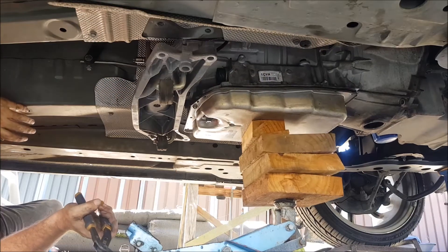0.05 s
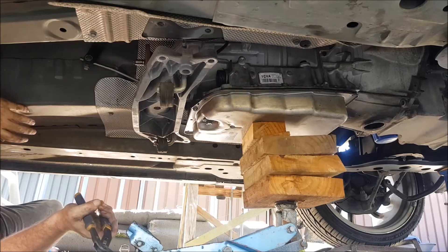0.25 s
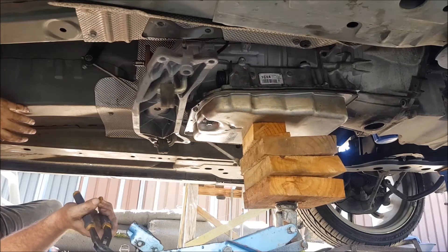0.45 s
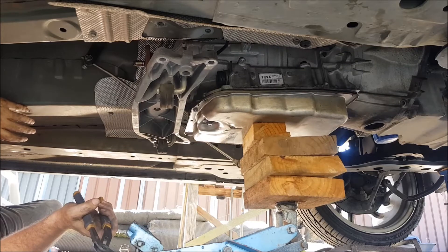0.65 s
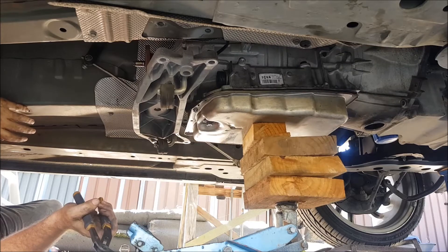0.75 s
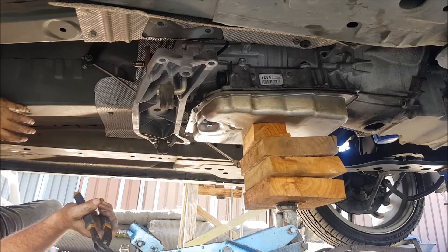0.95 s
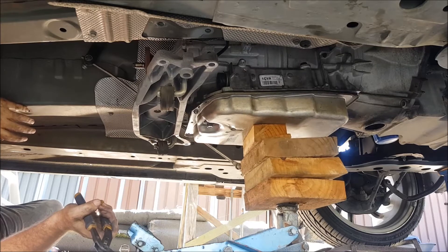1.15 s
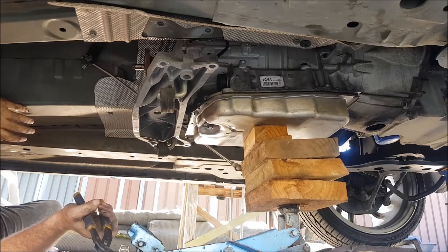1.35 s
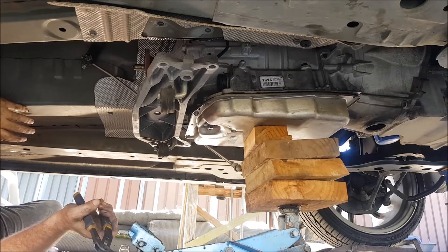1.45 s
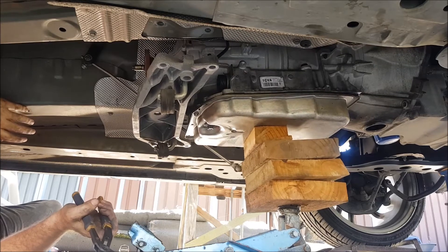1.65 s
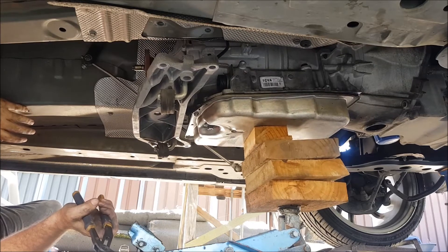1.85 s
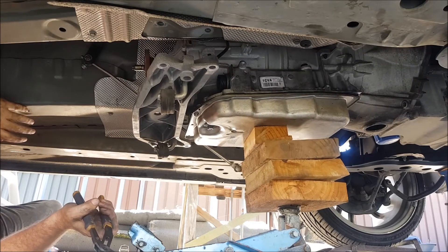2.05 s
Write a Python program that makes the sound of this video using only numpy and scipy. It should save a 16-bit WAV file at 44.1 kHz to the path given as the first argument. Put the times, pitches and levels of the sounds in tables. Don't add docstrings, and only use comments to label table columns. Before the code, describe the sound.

A heavy gearbox slips on wooden blocks over a trolley jack. After a faint slide and a tick at 0.13 s, five hollow knocks fall from 0.2 to 0.6 s, with harsh stick-slip scrapes between; the third, at 0.43 s, is loudest and rings steel. Faint ticks follow, clearer around 1.4-1.65 s, with a late faint scrape. Short garage echo, low rumble, slight hiss; close stereo microphone, brighter right.

```python
import sys
import numpy as np
from scipy import signal
from scipy.fft import rfft, irfft
from scipy.io import wavfile
from scipy.ndimage import uniform_filter1d

SR = 44100
rng = np.random.default_rng(int(sys.argv[2]) if len(sys.argv) > 2 else 0)


def invert_db(level):
    return 10 ** (np.asarray(level, dtype=float) / 20)


def generate_wav(signal):
    frames = np.transpose(np.atleast_2d(signal))
    scaled = np.clip(frames, -1, 1) * 32767
    pcm = np.round(scaled).astype(np.int16)
    wavfile.write(sys.argv[1], SR, pcm)


N = 92610

# (frequency [Hz], level [dB], decay t60 [s])
CASING_MODES = [(177.1, 2.5, 0.27), (217.1, -1.5, .2), (248, -0.5, 0.41), (278, -3, 0.39), (344.3, 1, 0.21),
                (388.6, 2, 0.13), (433.3, -7.5, 0.4), (498.1, -4.5, 0.14), (570, -5, .08),
                (674, -10.5, 0.27), (777, -11.5, .05), (941.2, -10.5, 0.052), (1084.5, -6, 0.04),
                (1222, -20.5, .1)]


def evened(x):
    return x / np.sqrt(np.mean(x ** 2) + 1e-20)


def read(points, hz):
    f, value = np.transpose(points)
    return np.interp(np.log(hz + 1), np.log(f + 1), value)


def add(mix, s, sound):
    part = mix[..., round(s * SR):][..., :sound.shape[-1]]
    part += sound[..., :part.shape[-1]]


def colour(x, points):
    hz = np.fft.rfftfreq(x.shape[-1], 1 / SR)
    return irfft(rfft(x) * invert_db(read(points, hz)), x.shape[-1])


def ring(modes, tilt_db=0., spread_db=1.5, length=0.39):
    hz, db, t60 = np.transpose(modes)[..., None]
    t = np.arange(round(length * SR)) / SR
    level = db + tilt_db * np.log2(hz / hz[0]) + spread_db * rng.standard_normal(hz.shape)
    size = invert_db(level) * np.sign(rng.standard_normal(hz.shape))
    decay = np.log(1000) / np.maximum(t60, .01)
    partials = size * np.exp(t * (2j * np.pi * hz - decay)).imag
    return partials.sum(0) * (1 - (t / length) ** 4)


def burst(hold_s, t60, tail_db, tail_t60):
    t = np.arange(SR // 4) / SR
    rise = np.minimum(t / .0015, 1)
    fall = invert_db(-60 * np.maximum(t - hold_s, 0) / t60)
    return rise * (fall + invert_db(tail_db - 60 * t / tail_t60))


def rumble(patchy_db=2.):
    # (frequency [Hz], level [dB])
    spectrum = [(26, -42.5), (45, -4.5), (161, -8), (191, -13.5), (506, -17.5), (641, -22.5), (912, -23),
                (2500, -41), (3250, -77.5), (5500, -120)]
    # (frequency [Hz], correlation [-])
    likeness = [(60, 0.93), (240, 0.93), (950, -0.21), (3770, -0.9), (15000, -2.8)]
    # (frequency [Hz], left over right [dB])
    balance = [(60, -0.5), (240, 0.5), (950, -8), (3770, -9.5), (15000, -3.5)]
    # (time [s], low rumble gain [dB])
    activity = [(0, 12.5), (.2, 10), (.3, 20), (.5, 12.5), (0.748, 3.5), (1.3, 3.5), (1.6, 7), (1.802, 8.5),
                (2.1, 6.5)]
    level_db, busy_hz = -56.5, 900
    frames, hz = N // 256 + 5, np.fft.rfftfreq(1024, 1 / SR)
    a, b, c, d, patches = rng.standard_normal((frames, 513, 5)).T
    patches = uniform_filter1d(patches, size=8, axis=0)
    patches = evened(uniform_filter1d(patches, size=10, axis=1))
    same = np.clip(read(likeness, hz), -1, 1)[:, None]
    left = a + 1j * b
    right = same * left + np.sqrt(1 - same ** 2) * (c + 1j * d)
    pan = read(balance, hz)[:, None] / 2
    gain = invert_db(read(spectrum, hz)[:, None] + patchy_db * patches + np.array([pan, -pan]))
    z = np.array([left, right]) * gain
    swell = np.interp(np.arange(frames) * 256 / SR, *np.transpose(activity))
    swell = swell / (1 + (hz[:, None] / busy_hz) ** 2)
    calm = signal.istft(z, nperseg=1024, noverlap=768)[1]
    busy = signal.istft(z * invert_db(swell), nperseg=1024, noverlap=768)[1]
    return invert_db(level_db) * busy[:, :N] / np.std(calm)


def hiss():
    # (frequency [Hz], level [dB])
    spectrum = [(1470, -38), (2500, 0), (2860, 4), (4780, -3.5), (14600, -10.5), (16200, -17)]
    port_db = -73 + np.array([[-4], [0]])
    return invert_db(port_db) * evened(colour(rng.standard_normal((2, N)), spectrum))


def room(x):
    # (frequency [Hz], decay t60 [s])
    room_t60 = [(150, 0.48), (1000, .25), (4000, 0.15), (12000, 0.15)]
    wet_db = [-13.5, -7]
    # (frequency [Hz], level [dB])
    far_side = [(200, -14.5), (600, 1.5), (2000, 0.5), (5000, -7.5), (9000, -19), (15000, -3)]
    # (frequency [Hz], level [dB])
    near_side = [(200, -14), (600, -3), (2000, 5.5), (15000, 2)]
    taps = np.zeros((2, SR // 2))
    jitter = rng.integers(0, 20, (2, (SR // 2 - 161) // 20))
    at = np.arange(160, SR // 2 - 20, 20) + jitter
    np.put_along_axis(taps, at, rng.choice([-1., 1.], at.shape), 1)
    hz, t, z = signal.stft(taps, SR, nperseg=256)
    t60 = np.maximum(read(room_t60, hz), .03)[:, None]
    tail = signal.istft(z * invert_db(-60 * t / t60), SR, nperseg=256)[1]
    wet = signal.fftconvolve(x[None], tail / np.linalg.norm(tail[0]), axes=1)[:, :N]
    wet = wet * invert_db(np.array(wet_db))[:, None]
    return np.array([colour(wet[0], far_side), colour(wet[1], near_side)])


def tick(db, hz, low_db, top_db):
    shape = burst(hold_s=0.0012, t60=.03, tail_db=-15, tail_t60=.15)
    noise = rng.standard_normal((3, len(shape)))
    band = [(800, -40), (hz * .6, -8), (hz, 0), (hz * 1.284, -6), (hz * 2.27, -26), (30000, -50)]
    treble = [(5000, -10), (9500, 8.5), (12000, 4), (16000, -4)]
    dull = [(250, -28), (600, 7), (1500, -12.5), (4000, -37)]
    snap = evened(colour(noise[0], band)) + invert_db(top_db) * evened(colour(noise[1], treble))
    low = evened(colour(noise[2], dull))
    port_db = np.array([[-29.5], [0]])
    return invert_db(db + 1) * shape * (snap * invert_db(port_db) + invert_db(low_db) * low)


def scrape(length, casing_db, tilt_db, grit_db, slips_per_s=1500, size_db=4.5):
    # (frequency [Hz], level [dB])
    grit_spectrum = [(880, -30), (1500, -9), (2230, -16), (4640, -18.5), (8160, -32), (12900, -20.5),
                     (16000, -31)]
    t = np.arange(SR // 4) / SR
    arch = np.sin(np.pi * np.clip(t / length, 0, 1) ** 0.44) ** 2
    size = invert_db(size_db * rng.exponential(1, len(t)))
    happens = rng.random(len(t)) < slips_per_s / SR
    slips = size * happens * rng.choice([-1., 1.], len(t))
    body = ring(CASING_MODES, tilt_db, length=.15)
    rung = signal.fftconvolve(slips * arch, body)[:len(t)]
    rough = 1 + uniform_filter1d(abs(evened(slips)), size=60)
    grit = evened(colour(rng.standard_normal(len(t)) * rough, grit_spectrum))
    return 3 * invert_db(casing_db) * rung / abs(rung).max() + invert_db(grit_db) * arch * grit


def shake(thump_hz, thump_db, casing_db, tilt_db):
    rise_s, hold_s, t60_s, rattle_s = .007, 0.02, 0.057, 0.0065
    t = np.arange(SR // 3) / SR
    turn = 2 * np.pi * thump_hz * t
    rise = np.sin(np.pi / 2 * np.minimum(t / rise_s, 1))
    swell = rise * invert_db(-60 * np.maximum(t - hold_s, 0) / t60_s)
    thump = swell * (np.sin(turn) + invert_db(-15) * np.sin(2.4 * turn))
    jolts = rng.standard_normal(len(t)) * np.exp(-t / rattle_s)
    rattle = signal.fftconvolve(ring(CASING_MODES, tilt_db), jolts / np.linalg.norm(jolts))[:len(t)]
    return invert_db(casing_db - 7) * rattle - invert_db(thump_db) * thump


def cloud(count=60):
    hz = np.exp(rng.uniform(np.log(1000), np.log(15500), count))
    t60 = .13 * (hz / 4000) ** -.4 * rng.uniform(.5, 0.84, count)
    return list(zip(hz, -21 + 4 * rng.standard_normal(count), t60))


def jack_modes():
    # (frequency [Hz], level [dB], decay t60 [s])
    faint = [(867, -30, .5), (1911, -26, .35), (3171, -18, .2), (6067, -18, .16), (6493, -18, .15),
             (7574, -19, .15), (8807, -14, .06), (11300, -18, .1), (13213, -16, .12), (14600, -18, .1)]
    arm_hz = [1485, 2111, 2258, 2643, 2825, 3376, 3668, 4199, 4421, 4985, 5206, 5375, 7000, 7834]
    # (level [dB], decay t60 [s])
    arm = [(-18, .5), (-11, .1), (-13, .1), (-16, .3), (-15, .17), (8, .045), (-12, .3), (-1, .13),
           (-8, .27), (2, .135), (-8, .12), (-7, .12), (-11, .2), (-5, .13)]
    return faint + cloud() + [(hz, *row) for hz, row in zip(arm_hz, arm)]


def knock(modes, crack_db, tilt_db, steel_db):
    # (frequency [Hz], level [dB])
    crack_spectrum = [(290, -39), (500, -7.5), (2850, -13.5), (3440, -6.5), (3920, -3.5), (6700, -13.5),
                      (14700, -13.5), (16000, -23)]
    struck = [(hz, db + tilt_db * max(np.log2(hz / 4000), 0), t60) for hz, db, t60 in modes]
    out = invert_db(steel_db + 0.5) * ring(struck, length=0.95)
    shape = burst(hold_s=0.0093, t60=0.016, tail_db=-24, tail_t60=0.037)
    tilted = [(hz, db + tilt_db * max(np.log2(hz / 3000), 0)) for hz, db in crack_spectrum]
    crack = evened(colour(rng.standard_normal(len(shape)), tilted))
    add(out, 0, invert_db(crack_db - 7) * shape * crack)
    return out


def scene():
    # (time [s], frequency [Hz])
    thumps = [
        (.2182, 204),
        (.345, 235),
        (.436, 186),
        (.5255, 188),
        (.601, 195),
    ]
    # (thump [dB], rattle [dB], rattle brightness [dB/octave])
    shakes = [
        (-2.5, -16, 3),
        (-20, -18.5, 2),
        (-11.5, -13, -5),
        (-19, -20, -1.5),
        (-28.5, -21, -1.5),
    ]
    # (time [s], crack [dB], brightness [dB/octave], steel ring [dB])
    knocks = [
        (0.2098, -18.5, -2.5, -57),
        (0.3369, -14.5, 1.5, -48),
        (0.4303, -6, 0.5, -17.5),
        (0.5205, -19, -2, -29.5),
        (0.5954, -25, -9.5, -38.5),
        (.611, -42, -10.5, -41.5),
    ]
    # (time [s], length [s], casing [dB], brightness [dB/octave], grit [dB])
    scrapes = [
        (0.042, 0.12, -45.5, 2.5, -55.5),
        (0.243, 0.073, -24, 8, -33.5),
        (0.355, 0.043, -20, 6, -35),
        (0.471, 0.043, -31, 1.5, -48.5),
        (0.609, 0.04, -43, -8.5, -56),
        (1.638, 0.073, -54, 12, -56),
    ]
    # (time [s], peak [dB], centre [Hz], low knock re peak [dB], treble re peak [dB])
    tick_events = [(0.0134, -50, 2950, -7, -4), (0.1333, -38.5, 3330, 1, -14),
                   (0.7634, -48.5, 10720, -15, -28), (0.7885, -53.5, 4070, -8, -29),
                   (1.012, -61.5, 3745, 3.5, -25), (1.0301, -59, 4030, -9, -30),
                   (1.1893, -61.5, 4470, -3, -6.5), (1.2322, -65.5, 2740, -10, 2),
                   (1.3069, -56.5, 3000, -19, -6.5), (1.3788, -62.5, 1760, -25.5, -7),
                   (1.4267, -38.5, 3930, -7.5, -24), (1.4952, -41.5, 5250, -39, 0.5),
                   (1.5623, -43.5, 4650, -11.5, -4), (1.635, -46, 3710, -9, -10.5),
                   (1.725, -57, 3690, 5.5, -26.5)]
    # (frequency [Hz], left over right [dB])
    shadow = [(60, 4), (150, -1), (380, -2), (950, -4.5), (2380, -11), (5980, -23.5), (15000, -31.5)]
    load, ticks, modes = np.zeros(N), np.zeros((2, N)), jack_modes()
    for (s, hz), row in zip(thumps, shakes):
        add(load, s, shake(hz, *row))
    settle_s, settle_db_per_s = 0.623, -250
    load = load * invert_db(settle_db_per_s * np.maximum(np.arange(N) / SR - settle_s, 0))
    for s, *row in knocks:
        add(load, s, knock(modes, *row))
    for s, *row in scrapes:
        add(load, s, scrape(*row))
    for s, *row in tick_events:
        add(ticks, s, tick(*row))
    left = colour(load, [(f, min(db, 0)) for f, db in shadow])
    right = colour(load, [(f, -max(db, 0)) for f, db in shadow])
    return np.array([left, right]) + ticks + room(load + ticks[1]) + rumble() + hiss()


def low_pass(x):
    return signal.sosfilt(signal.butter(12, 16660, fs=SR, output="sos"), x)


def record(dry):
    low_cut = signal.butter(2, 45, "high", fs=SR, output="sos")
    cut = signal.sosfilt(low_cut, dry)
    edge = signal.firwin(511, 16300, window=("kaiser", 9), fs=SR)
    band = signal.oaconvolve(cut, edge[None], "same")
    return low_pass(np.clip(band, -1, 1))


dry = scene()
out = record(dry)
generate_wav(out)
```